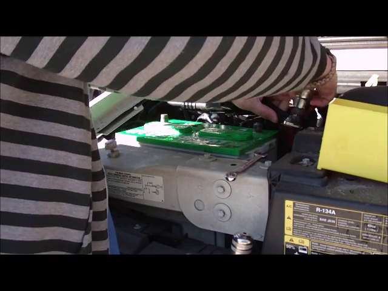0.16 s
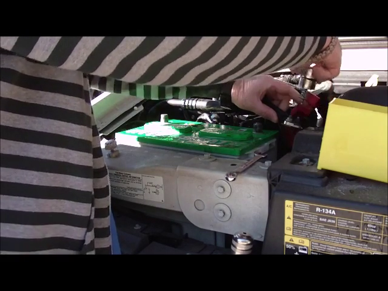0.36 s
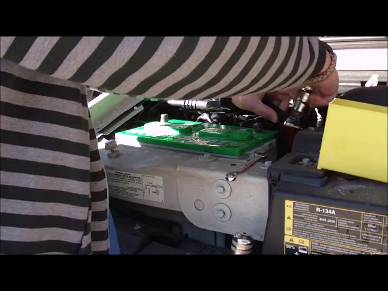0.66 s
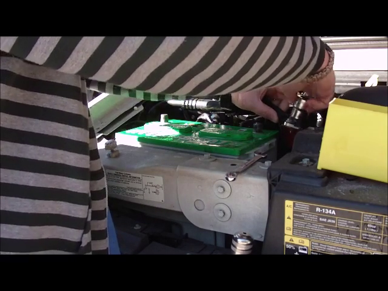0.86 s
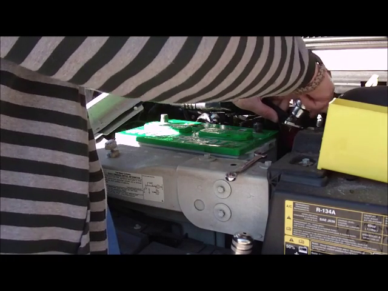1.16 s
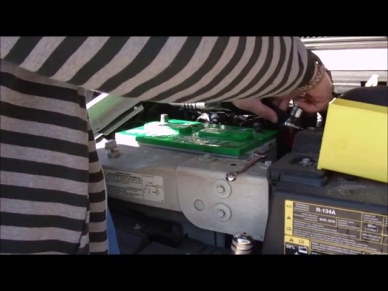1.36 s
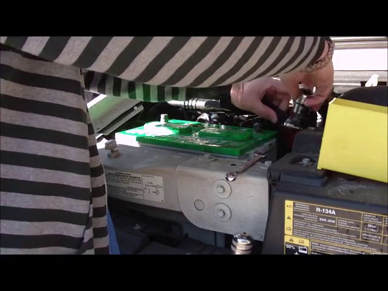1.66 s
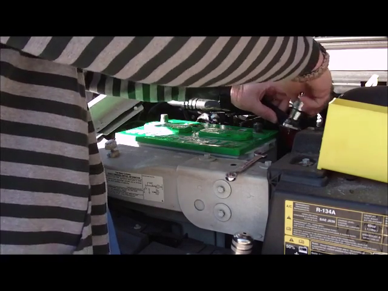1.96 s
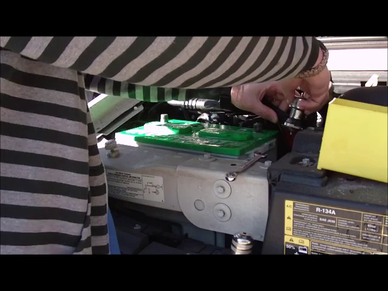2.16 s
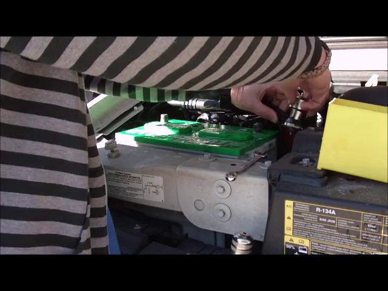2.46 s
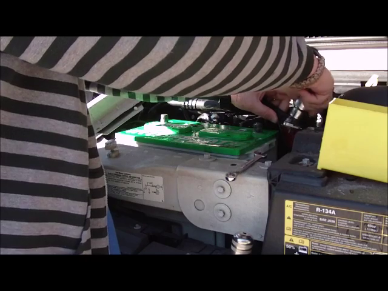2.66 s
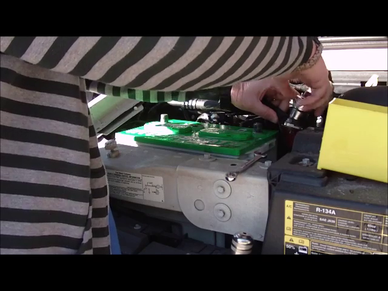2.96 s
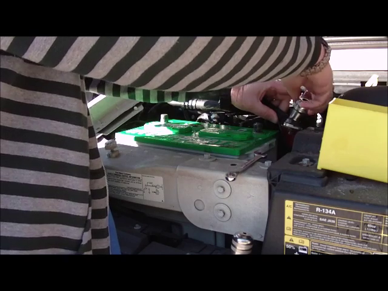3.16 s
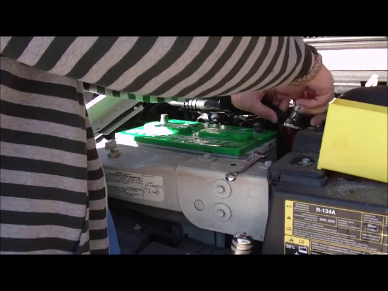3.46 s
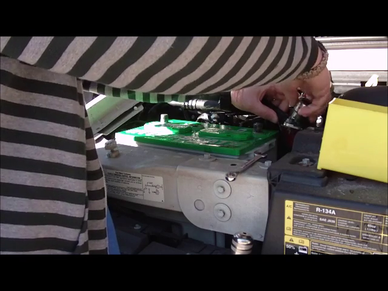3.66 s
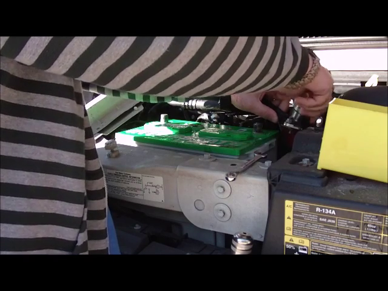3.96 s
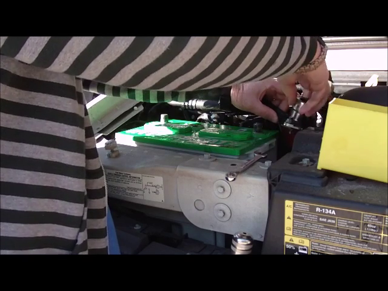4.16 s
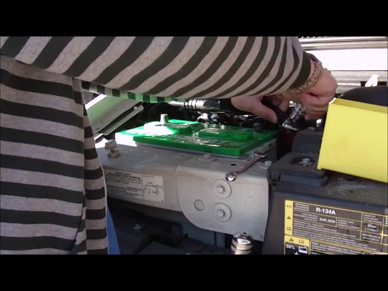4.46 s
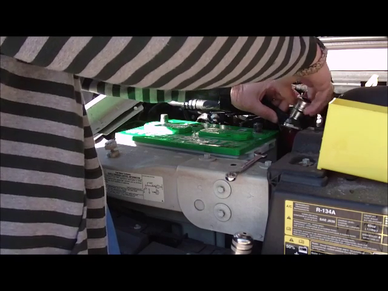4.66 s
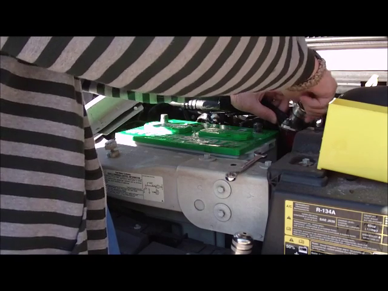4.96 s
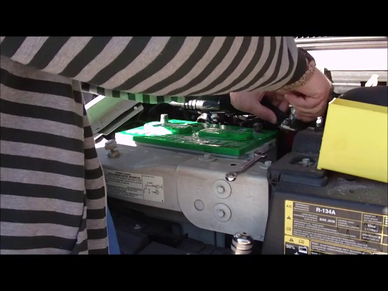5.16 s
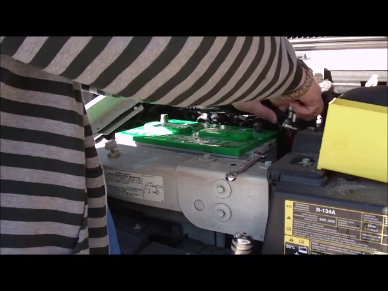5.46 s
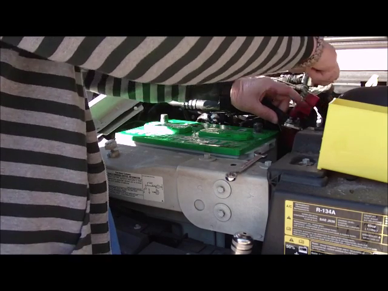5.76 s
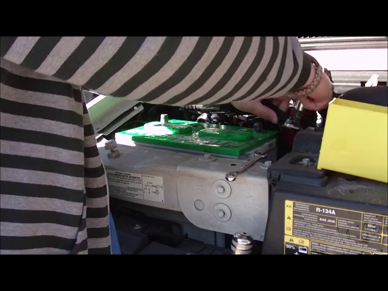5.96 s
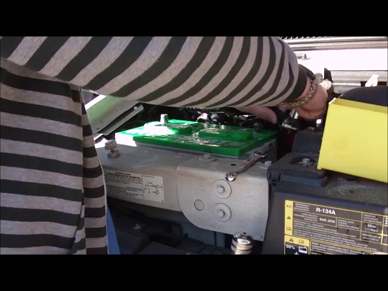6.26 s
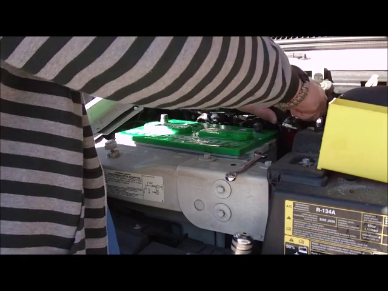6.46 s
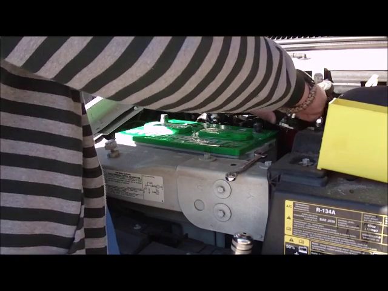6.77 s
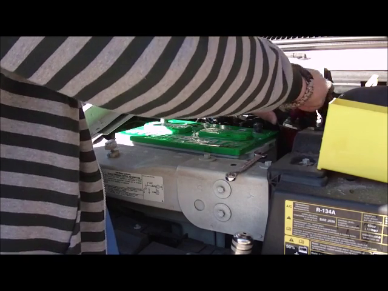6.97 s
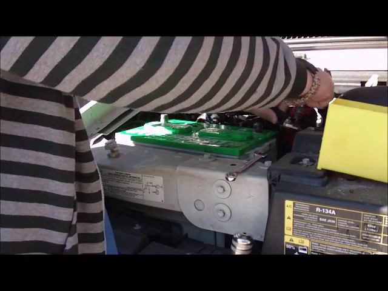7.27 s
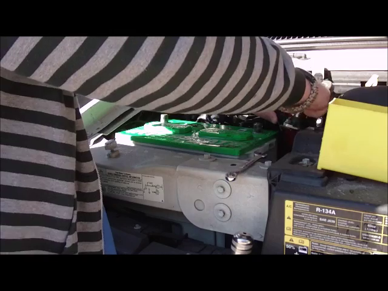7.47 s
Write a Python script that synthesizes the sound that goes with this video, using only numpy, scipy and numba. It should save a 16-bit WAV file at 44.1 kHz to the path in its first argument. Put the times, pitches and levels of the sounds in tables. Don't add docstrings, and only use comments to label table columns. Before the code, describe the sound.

Close wire brush twists inside a metal battery clamp in irregular scratchy strokes, with rattling clicks and small metallic rings over low garage hum.

```python
import sys
import numpy as np
from scipy import signal
from scipy.fft import rfft, irfft, next_fast_len
from scipy.io import wavfile
from scipy.ndimage import uniform_filter1d
from numba import njit

SR = 44100
rng = np.random.default_rng(int(sys.argv[2]) if len(sys.argv) > 2 else 0)


def generate_wav(sig):
    pcm = np.round(np.clip(np.atleast_2d(sig).T, -1, 1) * 32767).astype(np.int16)
    wavfile.write(sys.argv[1], SR, pcm)


def natural_amplitude(level_db):
    exponent = np.asarray(level_db, float) / 20
    return 10 ** exponent


N = 335601


def rms_one(x):
    return x / np.sqrt(np.mean(x ** 2) + 1e-20)


def in_time(rows):
    s, level = np.transpose(rows)
    return np.interp(np.arange(N) / SR, s, level)


def coloured(x, points):
    hz, db = np.transpose(points)
    size = next_fast_len(N)
    log_hz = np.log(np.fft.rfftfreq(size, 1 / SR) + 1)
    gain = natural_amplitude(np.interp(log_hz, np.log(hz), db, -90, -90))
    return rms_one(irfft(rfft(x, size) * gain, size)[:N])


def drift(rate_hz):
    r = np.exp(-2 * np.pi * rate_hz / SR)
    return rms_one(signal.lfilter([1], [1, -2 * r, r * r], rng.standard_normal(N + SR))[SR:])


def resonate(x, hz, width):
    r = np.exp(-np.pi * width / SR)
    ringing = signal.lfilter([1, 0, -1], [1, -2 * r * np.cos(2 * np.pi * hz / SR), r * r], x)
    return ringing * np.sqrt((1 - r * r) / 2)


def bank(x, modes):
    return sum((-1) ** k * natural_amplitude(db) * resonate(x, hz, width) for k, (hz, width, db) in enumerate(modes))


def band(x, low_hz, high_hz):
    return signal.sosfilt(signal.butter(2, [low_hz, high_hz], "band", fs=SR, output="sos"), x)


# pitch in Hz, level in dB per Hz.
RUMBLE_COLOUR = [(11, -23), (18, -1.5), (49, 10.5), (67, 9.5), (92, -29.5), (119, 13.5), (129, -7),
                 (177, -7), (220, -13), (290, -56), (480, -120)]
# pitch in Hz, width in Hz, level in dB against the rumble.
HUM_LINES = [(81.9, 4.7, -8.5), (120, 8.4, -7.5)]


def rumble_and_hum(traffic_db):
    rumble = natural_amplitude(-3.5) * coloured(rng.standard_normal(N), RUMBLE_COLOUR)
    hum = bank(rng.standard_normal(N), HUM_LINES)
    return natural_amplitude(-11.5 + 0.59 * traffic_db) * (rumble + hum)


# pitch in Hz, level in dB per Hz.
TRAFFIC_COLOUR = [(88, -46), (150, 3), (182, -9), (244, -5), (264, -8.5), (502, -11.5), (634, -12.5),
                  (1210, -16), (1780, -19.5), (9710, -45), (15800, -57.5)]


def traffic(traffic_db):
    return natural_amplitude(traffic_db + 1.6 * drift(5.5)) * coloured(rng.standard_normal(N), TRAFFIC_COLOUR)


# time in seconds, level in dB.
ENGINE_LEVEL = [
    (0, -86.5),
    (7.25, -54.5),
    (7.45, -34.5),
    (7.61, -51),
]


def far_engine():
    note = bank(rng.standard_normal(N), [(524.4, 17, -7.5), (444, 116, -5.5)])
    return natural_amplitude(in_time(ENGINE_LEVEL)) * note


def microphone_hiss(traffic_db):
    return natural_amplitude(-38 + 0.52 * traffic_db) * rng.standard_normal(N)


# time in seconds, traffic level in dB.
STREET_LEVEL = [(0.0, -55), (0.4, -58.5), (1.0, -51), (1.93, -56.5), (2.25, -57.5), (2.54, -51.5),
                (3.28, -54.5), (4.32, -45), (4.64, -49.5), (4.89, -47), (5.95, -53), (6.15, -51),
                (6.55, -47), (6.93, -50.5), (7.33, -49), (7.5, -42), (7.61, -44)]


def garage():
    traffic_db = in_time(STREET_LEVEL)
    steady = rumble_and_hum(traffic_db) + microphone_hiss(traffic_db)
    return steady + traffic(traffic_db) + far_engine()


def echoes(x):
    t = np.arange(SR // 5) / SR
    taps = rng.standard_normal(len(t)) * natural_amplitude(-60 * t / 0.04) * (t > .002)
    return signal.fftconvolve(x, taps / np.sqrt(np.sum(taps ** 2)))[:N]


# time in seconds, peak level in dB.
CAP_HIT = [
    (0.91, -7.5),
]
# pitch in Hz, level in dB, time to fall 60 dB in seconds.
CAP_NOTES = [(1390, -13, 0.039), (2600, -25.5, 0.25), (2800, -13.5, 0.028), (6480, -14, 0.21),
             (7320, -6, 0.018), (9100, -8, 0.11)]


def knock():
    (s, peak_db), t = CAP_HIT[0], np.arange(SR // 8) / SR
    crack = natural_amplitude(-5.0) * rng.standard_normal(len(t)) * natural_amplitude(-60 * t / 0.012)
    sound = band(crack, 1100, 9500)
    for hz, db, t60 in CAP_NOTES:
        sound += natural_amplitude(db - 14) * np.sin(2 * np.pi * hz * t) * natural_amplitude(-60 * t / t60)
    out = np.zeros(N)
    out[round(s * SR):][:len(t)] = natural_amplitude(peak_db + 3.5) * np.tanh(sound)
    return out


# start in seconds, peak level in dB, pitch
# in Hz, time to fall 60 dB in seconds.
BODY_RINGS = [(0.199, -46, 3110, 0.41), (0.282, -38.5, 2940, 0.093), (0.631, -47, 3110, 0.17),
              (0.636, -51, 3720, 0.082), (0.285, -58, 3150, 0.28), (0.79, -46, 2720, 0.13),
              (5.535, -50, 2750, 0.12), (0.713, -41.5, 3110, 0.21), (1.043, -41, 1835, 0.16),
              (1.448, -32, 1950, 0.1), (1.55, -32, 3080, 0.067), (2.94, -52, 2230, 0.12),
              (0.912, -33, 1300, 0.067), (3.072, -46, 2300, 0.18), (5.622, -32, 2740, 0.091),
              (6.109, -42, 2770, 0.08), (6.999, -39, 2730, 0.079), (7.465, -29, 3620, 0.11)]


def rings():
    out, clock = np.zeros(N), np.arange(N) / SR
    for s, db, hz, t60 in BODY_RINGS:
        t = clock - s
        out += (t > 0) * natural_amplitude(db - 60 * np.abs(t) / t60) * np.sin(2 * np.pi * hz * t)
    return out


# start in seconds, peak level in dB, pitch in Hz, time to fall 60 dB in seconds.
BODY_RATTLES = [(0.1688, -17, 2020, 0.059), (0.186, -14, 1940, 0.14), (0.631, -37, 3110, 0.068),
                (0.72, -15, 2730, 0.055), (0.722, -17.5, 1520, 0.04), (0.266, -29, 1800, 0.05),
                (1.166, -19.5, 1950, 0.05), (1.192, -19.5, 1520, 0.048), (0.8916, -18.5, 2370, 0.06),
                (0.9093, -22.5, 1400, 0.12), (0.962, -15, 1620, 0.061), (1.4457, -13.5, 1900, 0.027),
                (1.547, -19.5, 2800, 0.053), (1.5997, -20.5, 2850, 0.033), (1.7387, -17.5, 2640, 0.038),
                (1.7684, -17, 2590, 0.13), (1.9922, -22, 1700, 0.095), (3.3654, -23, 1570, 0.054),
                (3.394, -17.5, 1550, 0.033), (3.847, -16, 1440, 0.05), (4.134, -23.5, 2640, 0.046),
                (4.2094, -19, 2620, 0.028), (4.2857, -15.5, 2090, 0.11), (4.3904, -38, 1460, 0.049),
                (4.7648, -21.5, 2060, 0.055), (4.827, -14, 1770, 0.029), (4.924, -30, 1620, 0.046),
                (5.066, -48, 1440, 0.047), (3.66, -29, 3530, 0.026), (5.069, -13.5, 1460, 0.061),
                (6.107, -22, 1370, 0.036), (5.5915, -13.5, 1380, 0.12), (6, -24.5, 3350, 0.027),
                (6.5807, -18.5, 2410, 0.027), (6.937, -38, 2230, 0.027), (7.429, -15, 3150, 0.032),
                (7.4638, -8.5, 2960, 0.1)]


def rattles():
    out, t = np.zeros(N), np.arange(SR // 8) / SR
    for s, db, hz, t60 in BODY_RATTLES:
        tap = natural_amplitude(db - 17.5 - 60 * t / max(t60, .005)) * rng.standard_normal(len(t))
        sound = resonate(tap, hz, 120) + natural_amplitude(-23) * resonate(tap, 1800, 2000)
        at = round(s * SR)
        out[at:at + len(t)] += sound[:N - at]
    return out


# start in seconds, length in seconds, bristle level in dB, pitch of the hollow in Hz.
REST_MOVES = [
    (0.0, 0.29, -56, 1900),
    (0.665, 0.89, -49, 1900),
    (1.647, 1.08, -55, 1920),
    (3.066, 1.11, -50.5, 1950),
    (4.536, 1.14, -49, 1850),
    (5.645, 0.027, -62, 2500),
    (5.867, 0.092, -61.5, 1770),
    (5.997, 1.07, -52, 2280),
    (7.064, 0.49, -61, 1720),
    (7.4, 0.14, -57, 2740),
]


def rests():
    return [(s, length, .5, (0., 0.), db, -7, db - 10.5, (hz, hz), (0, 1)) for s, length, db, hz in REST_MOVES]


# start in seconds, length in seconds, bristle level in dB,
# share of the length where it is loudest, share where the brush starts to seat.
TWIST_MOVES = [
    (1.14, 0.21, -40, 0.28, 0.51),
    (1.879, 0.16, -36.5, 0.5, 0.39),
    (2.141, 0.18, -36.5, 0.29, 0.94),
    (2.491, 0.37, -31, 0.12, 0.56),
    (3.098, 0.31, -32.5, 0.7, 0.72),
    (3.697, 0.26, -29, 0.13, 0.2),
    (4.221, 0.33, -25.5, 0.58, 0.38),
    (4.821, 0.27, -24, 0.13, 0.19),
]
TWIST_OPEN_HZ, TWIST_SHUT_HZ = 1900, 1558


def twists():
    pitches, seating_share = (TWIST_OPEN_HZ, TWIST_SHUT_HZ), 0.092
    return [(s, length, peak, (-8, -12.5), db, 3.5, db - 14, pitches, (seats, seats + seating_share))
            for s, length, db, peak, seats in TWIST_MOVES]


# start in seconds, length in seconds, bristle level in dB, pitch of the hollow in Hz.
RUB_MOVES = [(0.005, 0.033, -37.5, 1800), (0.055, 0.059, -37, 2230), (0.63, 0.015, -69, 3100),
             (0.708, 0.016, -37, 2600), (0.75, 0.028, -41.5, 1900), (0.793, 0.014, -41, 2800),
             (0.95, 0.041, -38.5, 1620), (1.03, 0.027, -42, 1800), (1.375, 0.12, -39.5, 1950),
             (1.565, 0.064, -46, 3010), (1.69, 0.014, -59, 2760), (1.76, 0.023, -35.5, 2720),
             (1.812, 0.014, -38.5, 2770), (2.07, 0.014, -42, 1800), (2.33, 0.014, -37, 1770),
             (2.39, 0.025, -43, 1900), (2.9, 0.045, -45.5, 2180), (3.072, 0.017, -47, 2350),
             (3.46, 0.052, -42, 1880), (3.6, 0.011, -48.5, 1800), (3.655, 0.045, -52.5, 1900),
             (4.02, 0.024, -43.5, 1820), (4.12, 0.0086, -42, 2520), (4.57, 0.019, -40, 1900),
             (4.76, 0.027, -43.5, 2140), (5.12, 0.039, -41, 1680), (5.19, 0.034, -41.5, 1470),
             (5.23, 0.045, -33.5, 2240), (5.5, 0.153, -48.5, 2480), (4.625, 0.021, -48.5, 1900)]
# start in seconds, length in seconds, bristle level in dB, pitch of the hollow in Hz.
SCRUB_MOVES = [(6.08, 0.037, -52, 2600), (6.17, 0.051, -40, 2870), (6.22, 0.053, -30.5, 2250),
               (6.285, 0.017, -36.5, 2110), (6.345, 0.038, -39.5, 2230), (6.445, 0.078, -47, 2530),
               (6.53, 0.073, -37.5, 2380), (6.6, 0.058, -30.5, 2250), (6.665, 0.02, -37.5, 2170),
               (6.73, 0.11, -44.5, 2190), (6.825, 0.059, -37, 2240), (7.5, 0.073, -31, 2430),
               (7.59, .03, -44.5, 2110)]


def rubs_and_scrubs():
    return [(s, length, 0.11, (-20.5, -2), db, -1, db - 11, (hz, hz), (0, 1))
            for rows in (RUB_MOVES, SCRUB_MOVES) for s, length, db, hz in rows]


# start in seconds, length in seconds, level of the hollow in dB, first Hz, last Hz.
SLIDE_MOVES = [(0.175, 0.053, -35.5, 1800, 2800), (0.264, 0.033, -50, 2670, 3000),
               (0.887, 0.03, -30.5, 2380, 1730), (1.423, 0.076, -46, 1810, 2000),
               (1.494, 0.039, -40, 2600, 2660), (1.532, 0.022, -48.5, 3000, 3150),
               (2.255, 0.059, -53, 1960, 1830), (2.456, 0.038, -45, 2030, 1950),
               (2.66, 0.043, -56.5, 1720, 1650), (5.42, 0.045, -60.5, 1500, 1450),
               (1.667, 0.056, -50, 2800, 2740), (2.939, 0.035, -56, 2100, 2160),
               (3.054, 0.032, -60, 2380, 2360), (3.127, 0.044, -59, 1950, 1850),
               (3.79, 0.082, -46.5, 1480, 1470), (3.874, 0.042, -49, 1430, 1460),
               (3.327, 0.057, -54, 1590, 1500), (3.493, 0.04, -49, 2180, 2030),
               (4.576, 0.1, -49.5, 2130, 1950), (4.908, .12, -45.5, 1520, 1500),
               (5.053, 0.088, -44.5, 2140, 2120), (5.58, 0.042, -35, 1410, 2190),
               (5.598, 0.029, -24.5, 2230, 2800), (6.93, 0.088, -27.5, 2120, 2800),
               (7.425, 0.025, -45.5, 3150, 3040), (7.453, 0.069, -34, 3150, 2250)]


def slides():
    return [(s, length, 0.61, (-14, -11.5), db - 5.5, 3.5, db, (first_hz, last_hz), (0, 1))
            for s, length, db, first_hz, last_hz in SLIDE_MOVES]


def stroke(start, length, peak, shape):
    attack_s, release_s = 0.0025, 0.031
    at, end = round(start * SR), length + release_s
    t = np.arange(min(round(end * SR), N - at)) / SR
    times = [0, np.clip(peak, .05, .95) * length, length, end]
    db = np.interp(t, times, [shape[0], 0, shape[1], shape[1] - 60])
    return slice(at, at + len(t)), t / length, natural_amplitude(db) * np.clip(t / attack_s, 0, 1)


def hands():
    grip_s, grip_db = 5.38, -14
    wires, ring, air, power, pitch = np.ones(N) * [[1e-9], [1e-9], [0], [1e-12], [2e-9]]
    for s, length, peak, shape, db, clamp_db, air_db, hz, closes in rests() + twists() + rubs_and_scrubs() + slides():
        span, done, press = stroke(s, length, peak, shape)
        wires[span] += natural_amplitude(db) * press
        air[span] += natural_amplitude(air_db) * press
        ring[span] += natural_amplitude(db + clamp_db + grip_db * (s > grip_s)) * press
        weight = (natural_amplitude(air_db) * press) ** 2
        power[span] += weight
        pitch[span] += weight * np.interp(done, closes, hz)
    air_hz = pitch / power
    seated = np.clip((TWIST_OPEN_HZ - air_hz) / 400, 0, 1)
    return wires, ring / wires, air * natural_amplitude(-3 * seated), air_hz


def slips(per_s, spread_db):
    sizes = natural_amplitude(spread_db * np.minimum(rng.exponential(1, N), 3.0)) * rng.choice([-1, 1], N)
    return rms_one(sizes * (rng.random(N) < per_s / SR))


def clumps(per_s, t60, between_db):
    starts = (rng.random(N) < per_s / SR) * np.minimum(rng.exponential(1, N), 2.2)
    bunches = signal.lfilter([1], [1, -natural_amplitude(-60 / (t60 * SR))], starts)
    return rms_one((natural_amplitude(between_db) + bunches) * natural_amplitude(0.81 * drift(20.6)))


def bursts(rows, attack_s):
    out = np.zeros(N)
    for s, db, t60 in rows:
        at = round(s * SR)
        t = np.arange(min(N - at, SR // 8)) / SR
        onset = 1 - np.exp(-t / max(attack_s, 1e-4))
        out[at:at + len(t)] += natural_amplitude(db - 11.5 - 60 * t / max(t60, .004)) * onset
    return out


# start in seconds, peak level in dB, time to fall 60 dB in seconds.
WIRE_SNAGS = [(0.0595, -16, 0.0079), (0.1658, -11.5, 0.067), (0.629, -30, 0.054), (0.713, -20, 0.017),
              (0.908, -13, 0.012), (1.3856, -31, 0.011), (1.538, -6.5, 0.012), (1.5705, -16, 0.012),
              (1.596, -35, 0.035), (1.7396, -19, 0.018), (1.9109, -15, 0.018), (2.474, -15.5, 0.027),
              (2.7581, -7.5, 0.04), (2.8225, -8.5, 0.014), (2.9483, -9, 0.011), (3.1612, 5, 0.011),
              (3.692, -9, 0.017), (4.1341, 0.5, 0.0083), (4.2081, 2.5, 0.013), (4.289, -8, 0.013),
              (4.509, -17, 0.045), (4.7162, -6.5, 0.018), (5.0394, -10, 0.013), (5.3492, -23, 0.05),
              (5.4131, -17, 0.026), (5.595, -12.5, 0.032), (6.0053, -16.5, 0.031), (6.1046, -18.5, 0.036),
              (6.4098, -15, 0.017), (7.4641, -1.5, 0.019)]
# start in seconds, peak level in dB.
WIRE_FLICKS = [(0.013, -34.5), (0.059, -25.5), (0.1432, -25.5), (0.1667, -24), (0.631, -24.5),
               (0.7033, -33), (0.711, -23.5), (0.7996, -21), (0.8786, -26), (0.892, -14), (0.9108, -9),
               (0.958, -25), (1.039, -34.5), (1.1273, -33.5), (1.162, -30), (1.1637, -21), (1.3862, -31.5),
               (1.3872, -32), (1.4157, -22.5), (1.4421, -9), (1.4775, -29), (1.514, -26), (1.5384, -29),
               (1.5723, -25.5), (1.598, -22), (1.618, -27), (1.7386, -28), (1.7669, -32), (1.8158, -35.5),
               (1.884, -23.5), (1.9115, -21), (1.9695, -22), (2.066, -38), (2.077, -26), (2.1632, -15),
               (2.188, -23), (2.221, -16.5), (2.2602, -13), (2.288, -16), (2.3386, -31), (2.377, -33),
               (2.398, -18.5), (2.4733, -28), (2.4957, -28.5), (2.5331, -17), (2.5532, -12.5),
               (2.6434, -28.5), (2.7164, -19.5), (2.7371, -12.5), (2.7575, -25.5), (2.807, -18),
               (2.823, -13), (2.946, -27.5), (2.946, -27.5), (3.0789, -27), (3.1632, -36), (3.1996, -33.5),
               (3.2093, -18), (3.244, -20.5), (3.458, -27.5),
               (3.4583, -34), (3.598, -26.5), (3.6584, -21.5), (3.692, -27.5), (3.705, -23.5),
                 (3.7162, -22.5), (3.7346, -17.5), (3.7472, -15.5), (3.7686, -16.5), (3.7786, -25.5),
                 (3.8105, -15), (3.834, -18), (3.9063, -23), (3.908, -10), (3.9492, -33), (4.0255, -21),
                 (4.064, -20), (4.1203, -26.5), (4.1318, -10), (4.2094, -33), (4.2101, -26.5),
                 (4.2306, -10.5), (4.255, -24.5), (4.266, -17.5), (4.2734, -13.5), (4.2934, -8.5),
                 (4.3334, -23), (4.3512, -15.5), (4.3667, -21.5), (4.3892, -12), (4.42, -6.5), (4.475, -21),
                 (4.5104, -7.5), (4.5174, -12), (4.5813, -19.5), (4.6112, -38), (4.6386, -35.5),
                 (4.6546, -31), (4.7133, -30.5), (4.7653, -22), (4.771, -29.5), (4.8053, -18.5),
                 (4.8292, -30), (4.8312, -29), (4.846, -26), (4.857, -28.5), (4.8656, -12), (4.9074, -8.5),
                 (4.9243, -10), (4.9362, -7), (4.9862, -19), (5.0253, -17), (5.0392, -12.5), (5.0686, -10),
                 (5.148, -22.5), (5.1814, -25), (5.196, -33), (5.2343, -21.5), (5.2548, -18.5),
                 (5.303, -17),
               (0.9592, -33), (1.193, -31), (1.2141, -43), (1.2394, -36), (1.279, -19), (1.2917, -20),
                  (1.323, -31), (1.4286, -16), (2.3092, -18), (2.4176, -22), (2.5687, -13.5), (2.5924, -23),
                  (2.6644, -21), (2.69, -18), (2.7794, -19), (3.2635, -24), (3.2894, -35), (3.3194, -32),
                  (3.3578, -25), (3.384, -21), (3.7594, -25), (3.8494, -19), (3.923, -21), (4.3094, -16),
                  (4.3894, -21), (4.406, -15), (4.4394, -4.5), (4.4475, -16), (4.495, -26), (4.876, -15),
                  (4.892, -23), (4.9594, -21), (4.9876, -11), (5.114, -12), (5.2765, -21), (5.5424, -25),
                  (5.6114, -12), (5.6264, -42), (5.6695, -45.5), (6.1785, -29.5), (6.228, -26),
                  (6.3714, -18), (6.652, -15), (6.9944, -29), (7.0024, -20),
               (5.352, -29), (5.4131, -29), (5.5226, -24.5), (5.5666, -22), (5.592, -2.5), (5.6474, -22),
                  (6.0036, -34.5), (6.0836, -33), (6.0842, -23), (6.1086, -17.5), (6.1713, -33.5),
                  (6.1805, -24), (6.2283, -32), (6.2308, -22.5), (6.2547, -25.5), (6.2936, -28),
                  (6.349, -41), (6.349, -27), (6.358, -28), (6.4102, -26), (6.4453, -28), (6.4677, -23.5),
                  (6.4982, -17), (6.5376, -26.5), (6.558, -31), (6.575, -23), (6.6116, -20.5),
                  (6.6387, -16), (6.6747, -11.5), (6.7326, -23), (6.734, -26), (6.7642, -20), (6.792, -21),
                  (6.8324, -28), (6.8324, -20), (6.9292, -26), (6.9506, -27), (6.9584, -18),
                  (6.9828, -17.5), (7.4053, -23), (7.431, -31.5), (7.4635, -20.5), (7.4884, -27),
                  (7.5144, -31.5), (7.559, -26.5)]


def snags_and_flicks():
    sudden = WIRE_FLICKS
    flicks = bursts([(s, db + 6.5, 0.013) for s, db in sudden], attack_s=.0017)
    return bursts(WIRE_SNAGS, attack_s=0.0079) + flicks


def patches(count, depth_db):
    touch = uniform_filter1d(rng.standard_normal((count, N // 512 + 2)), size=3) * np.sqrt(3)
    return [natural_amplitude(depth_db * np.interp(np.arange(N) / 512, np.arange(len(row)), row)) for row in touch]


def pings(drive, patchy_db, cycles):
    pitches = np.geomspace(4300, 15000, 32)
    dealt = rng.integers(0, 32, N)
    gains = patches(count=32, depth_db=patchy_db)
    return sum(resonate(drive * gains[k] * (dealt == k) + 1e-18, hz, hz / cycles)
               for k, hz in enumerate(pitches))


# pitch in Hz, level in dB per Hz.
BRISTLE_COLOUR = [(1700, -57), (2600, 1.5), (4300, -19.5), (5500, -10), (7400, 0), (8200, -4), (10500, 2),
                  (12000, 1), (14500, -7.5), (15400, 5), (15800, -31)]


def bristles(drive):
    tips = natural_amplitude(-4) * drive + natural_amplitude(2) * pings(drive, patchy_db=4.5, cycles=35.0)
    return coloured(tips, BRISTLE_COLOUR) * np.sqrt(np.mean(drive ** 2))


# pitch in Hz, width in Hz, level in dB.
CLAMP_NOTES = [(6140, 160, -13), (6385, 70, -1), (6495, 70, 0), (6700, 150, -9)]


def clamp(drive):
    fits = patches(count=len(CLAMP_NOTES), depth_db=2.0)
    ringing = sum((-1) ** k * bank(drive * fits[k] * natural_amplitude(-5.5), [mode]) for k, mode in enumerate(CLAMP_NOTES))
    return band(ringing, 5750, 7200)


@njit
def glide(x, turn, r):
    y = np.zeros(len(x))
    for i in range(2, len(x)):
        y[i] = (1 - r) * (x[i] - x[i - 2]) + r * (turn[i] * y[i - 1] - r * y[i - 2])
    return y


# pitch in Hz, width in Hz, level in dB.
BODY_NOTES = [(1300, 27, -34), (1380, 27, -13), (1463, 28, 18), (1620, 72, 11.5), (1800, 110, 5),
              (1950, 32, -9), (2060, 18, 4), (2230, 100, -26.5), (2343, 55, 4.5), (2870, 80, -22.5),
              (2730, 29, 11), (3150, 87, 16.5), (3110, 19, 16), (3350, 78, 12), (3566, 110, 16)]


def hollow(drive, hz):
    turn, r = 2 * np.cos(2 * np.pi * hz / SR), np.exp(-np.pi * 180 / SR)
    air = glide(glide(drive, turn, r), turn, r)
    out = natural_amplitude(13.5) * air
    for (mode_hz, width, db), fit in zip(BODY_NOTES, patches(count=len(BODY_NOTES), depth_db=3.0)):
        near = .04 + 1 / (1 + ((mode_hz - hz) / 125) ** 2)
        out = out + natural_amplitude(db - 10.5) * resonate(drive * near * fit, mode_hz, width)
    return signal.sosfilt(signal.butter(4, 1250, "high", fs=SR, output="sos"), out)


def brush():
    pressure, ring, air, air_hz = hands()
    jumps = slips(9000, spread_db=3.5)
    bunched = clumps(170, .018, between_db=-2.5)
    effort = np.maximum(pressure - natural_amplitude(-63), 0)
    clumping = 0.4 + 1.1 / (1 + (pressure / natural_amplitude(-43)) ** 2)
    drive = jumps * (natural_amplitude(-2.5) * effort * bunched ** clumping + snags_and_flicks())
    cavity = hollow(jumps * np.sqrt(bunched) * air, air_hz)
    return bristles(drive) + clamp(drive * ring) + cavity


def scene():
    near = brush() + rattles() + rings() + knock()
    mid = near + natural_amplitude(-9.5) * echoes(near) + garage()
    side_colour = [(15, 0), (60, -9), (250, -22), (500, -32), (900, -46)]   # (Hz, dB)
    side = natural_amplitude(-72) * coloured(rng.standard_normal(N), side_colour)
    return np.array([mid + side, mid - side])


def low_pass(x):
    return signal.sosfilt(signal.butter(12, 16500, fs=SR, output="sos"), x)


def record(dry):
    cut = signal.sosfilt(signal.cheby2(10, 50, 15950, fs=SR, output="sos"), dry)
    return low_pass(cut - .0009)


dry = scene()
out = record(dry)
generate_wav(out)
```